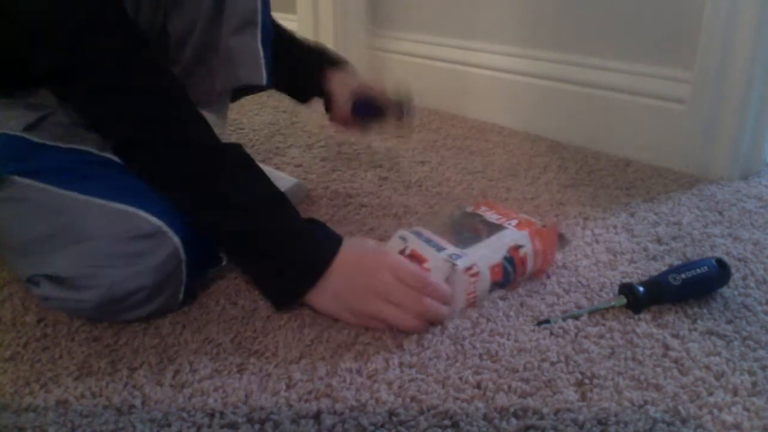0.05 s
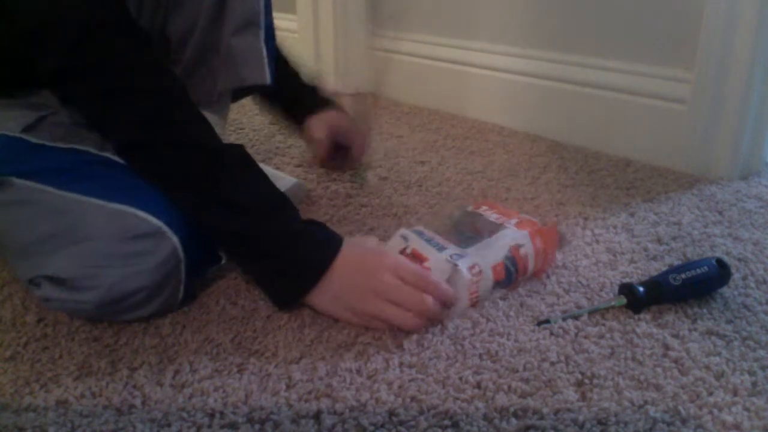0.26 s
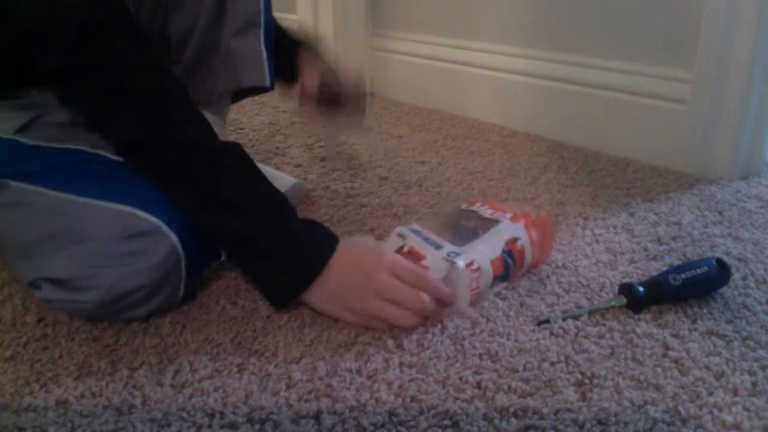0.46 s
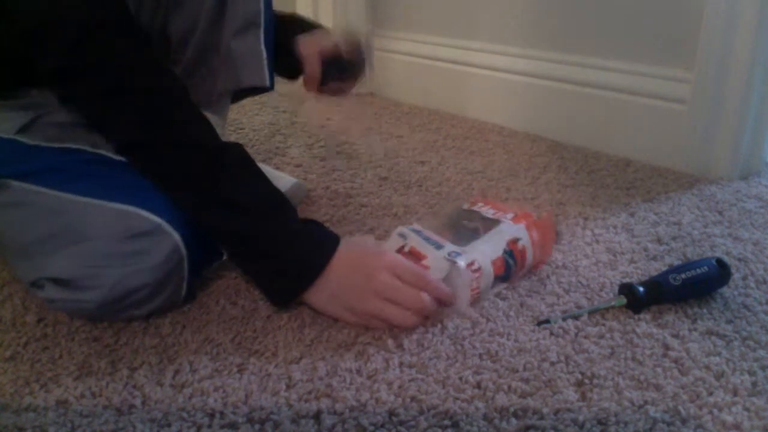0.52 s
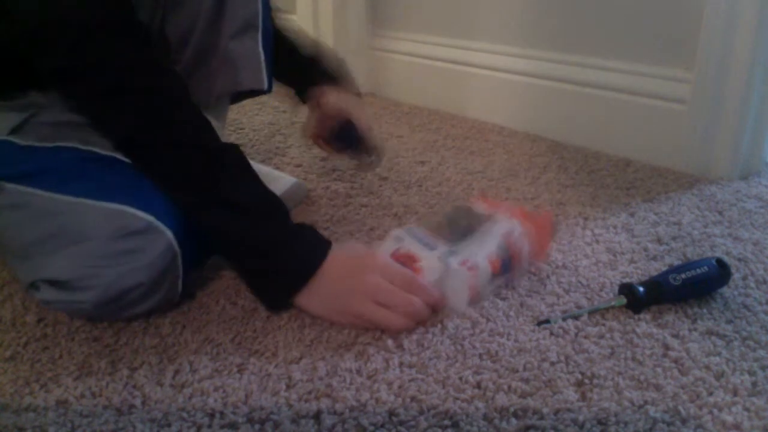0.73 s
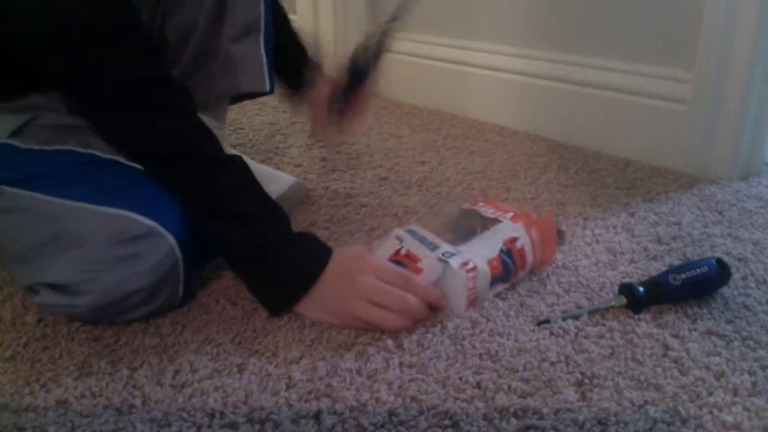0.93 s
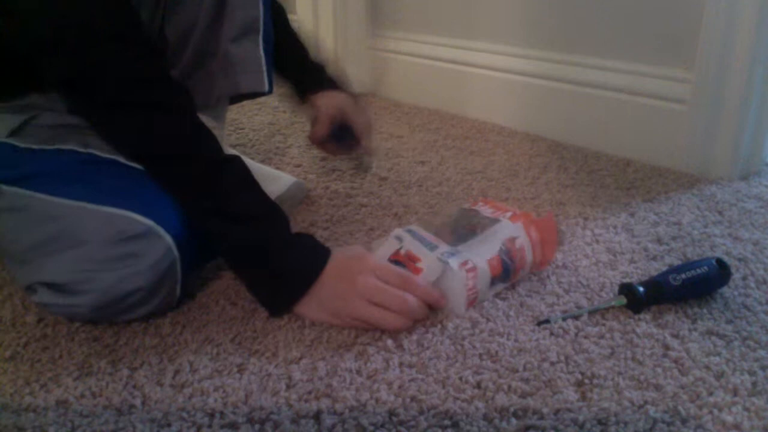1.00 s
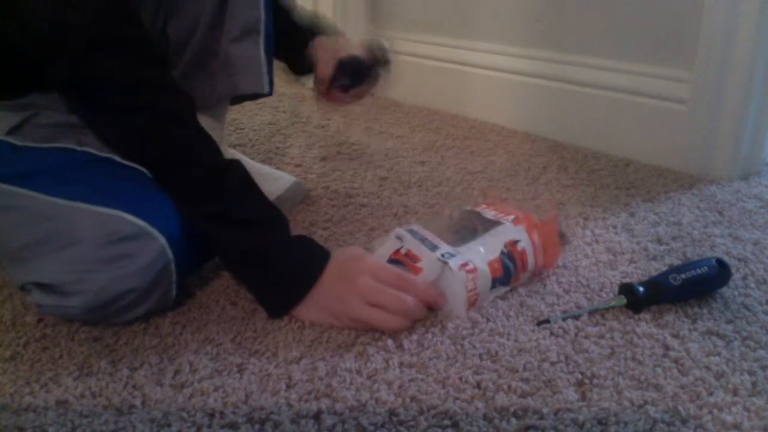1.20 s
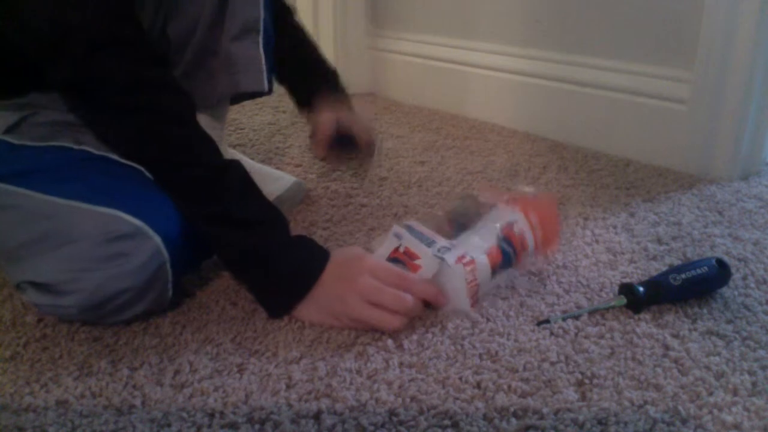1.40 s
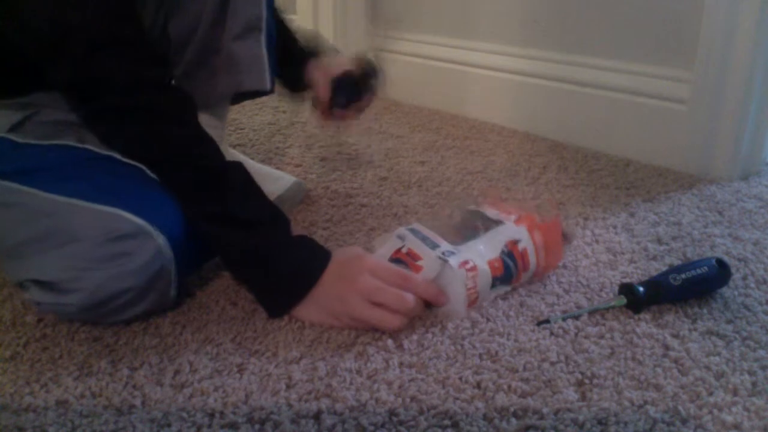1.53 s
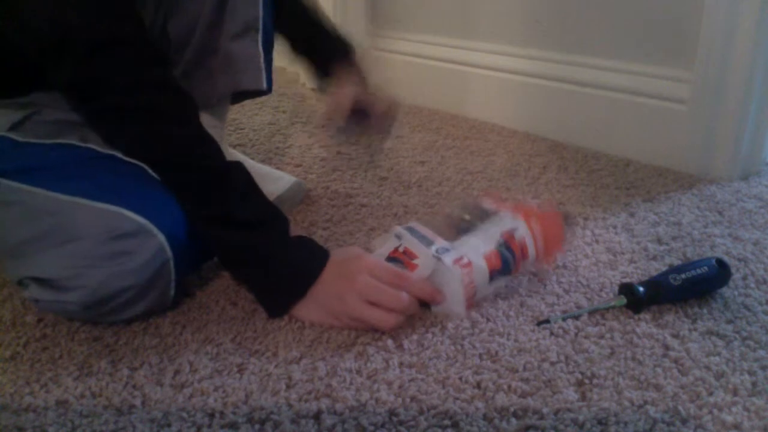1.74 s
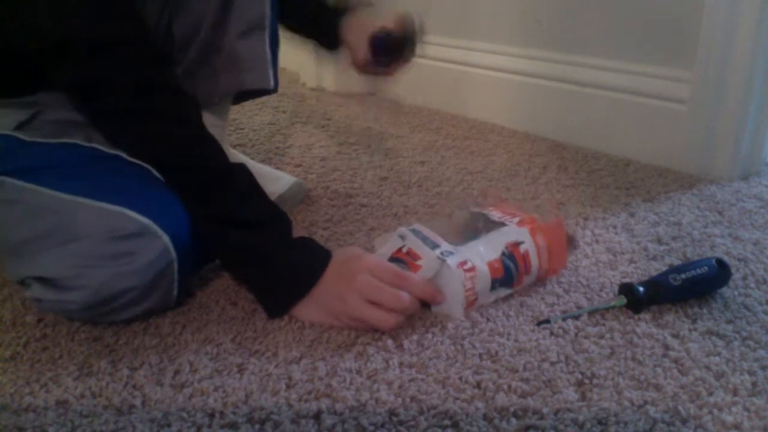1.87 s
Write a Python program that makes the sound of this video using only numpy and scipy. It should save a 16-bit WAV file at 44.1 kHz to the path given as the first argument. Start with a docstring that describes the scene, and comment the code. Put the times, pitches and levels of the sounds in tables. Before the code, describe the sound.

Five sharp, evenly paced knocks of a screwdriver on a cardboard box, close up.

```python
"""Screwdriver on a cardboard box

Small carpeted room, microphone close enough to overload. A screwdriver beats a small box with a plastic
window: each blow rings the panels, crunches the window and squashes the box with a falling thump.
The ceiling slaps back and the room rings. Two thin, fading repeats follow every knock, as if a small
loudspeaker nearby played the microphone back late."""
import sys
import numpy as np
from scipy import signal
from scipy.fft import rfft, irfft, next_fast_len
from scipy.io import wavfile

SR = 44100
rng = np.random.default_rng(int(sys.argv[2]) if len(sys.argv) > 2 else 0)


def generate_wav(signal):
    """Clip the signal to [-1, 1] and save it as 16-bit WAV at the path in sys.argv[1]."""
    frames = np.transpose(np.atleast_2d(signal))
    scaled = np.clip(frames, -1, 1) * 32767
    pcm = np.round(scaled).astype(np.int16)
    wavfile.write(sys.argv[1], SR, pcm)


N = 85995
LEAD_S = .25   # run-up, so that an earlier blow still rings at the start
LEAD = int(LEAD_S * SR)
LENGTH = N + LEAD

# room tone: f/Hz, relative density/dB
AIR_SPECTRUM = [(25, -16), (60, 5.5), (120, -11.5), (250, -11), (450, -25.5), (800, -15.5), (1700, -12.5),
                (2800, -23.5), (5500, -24), (8000, -31.5), (11000, -44.5), (15000, -42)]
# response of the small loudspeaker: f/Hz, level/dB
SPEAKER_RESPONSE = [(80, -25), (220, -12.5), (500, -19.5), (850, -27), (1000, -1.5), (1350, -4.5),
                    (1750, 5), (2300, -6.5), (2650, -4), (3300, -1.5), (4700, 6.5), (5300, 1), (6200, 6),
                    (8000, 7), (8800, -9), (11000, -6), (13000, -16.5), (15500, -34)]
# diffuse tail of a knock: f/Hz, relative density/dB
TAIL_SPECTRUM = [(55, -0.5), (100, -6.5), (160, -10), (280, 2.5), (420, -16), (620, -10), (900, -1.5),
                 (1150, -0.5), (1700, 0.5), (2200, -1), (2900, -13.5), (3800, -5), (5200, -7.5),
                 (7500, -10.5), (10000, -20.5), (14000, -41.5)]
# reverberation time of the room: f/Hz, t60/s
ROOM_DECAY = [(100, 0.25), (260, 0.3), (700, 0.37), (1800, 0.31), (4800, 0.31), (8000, .3), (13000, 0.21)]
# bass bouncing between the walls: t/s, level/dB
WALL_ECHOES = [(0.031, -12.5), (.073, -15.5), (.111, -15)]
# crunch of card and window: f/Hz, relative density/dB
CRUNCH_SPECTRUM = [(200, -14), (500, -7), (800, -17.5), (1500, 8), (2500, -5), (4500, 1.5), (7000, -5.5),
                   (10000, -9.5), (15000, -25)]
# resonances of the box: f/Hz, relative level/dB, t60/s
CARDBOARD_MODES = [(690, -21, 0.011), (1025, -23.5, 0.034), (1146, -18, 0.032), (1149, -11, 0.027),
                   (1370, -18, 0.045), (1780, -21, 0.0095), (1894, -13.5, 0.017), (2063, -14.5, 0.018),
                   (3500, -12, 0.013), (4190, -18.5, 0.011), (4693, -23.5, 0.019)]
# blows, all levels relative: t/s, level/dB, struck panel f/Hz, crunch/dB, window crack/dB,
# hollow knock/dB, thump/dB, thump start f/Hz, room tail/dB
SCREWDRIVER_BLOWS = [(-0.176, -6, 1747, -4.5, 0.5, 8, 0, 436, -1),
                     (0.2236, -2, 1592, 4, -12, -2, 3.5, 482, 0.5),
                     (0.6112, -2.5, 1797, 0, 6, 1, -3, 531, -0.5),
                     (0.9641, -3.5, 1503, 1, -5, -18, 1.5, 548, -1),
                     (1.3063, 0.5, 1622, -3, -6, 1.5, -0.5, 473, -2.5),
                     (1.6336, -0.5, 1760, -1, 2.5, -3, -1.5, 444, -2.5)]

AIR_DB = -55
REPEAT_S, REPEAT_DB = .2895, -24
SPEAKER_SCATTER_DB, SPEAKER_SCATTER_T60_S = -10.5, 0.085   # farther off the microphone, so more diffuse
TAIL_DB, TAIL_ONSET_S = 23.5, 0.0074
CEILING_S, CEILING_DB, CEILING_LOW_CUT_HZ = .0148, -14.5, 254
CEILING_SCATTER_DB, CEILING_SPREAD_S = -11.5, 0.0098
WALL_BAND_HZ = (56, 100)
THUMP_DB, THUMP_ATTACK_S, THUMP_LENGTH_S = -11.5, 0.0023, 0.021
THUMP_END_HZ, THUMP_GLIDE_S = 42.5, 0.00757
CRUNCH_PEAK_S, CRUNCH_WIDTH_S, CRUNCH_DB, CRUNCH_INTO_BOX_DB = 0.0032, .001, -1, 5
SNAPS_PER_S, SETTLE_DB, SETTLE_T60_S = 9000, -8, 0.042
BOX_DB, PANEL_DB, PANEL_T60_S = 1, 2, 0.019
CRACK_HZ, CRACK_DB, CRACK_T60_S = 3230, -11.5, 0.015   # the plastic window
HOLLOW_HZ, HOLLOW_DB, HOLLOW_T60_S = 547, -14, 0.039   # the air in the box
CUTOFF_HZ = 15500


def from_db(db):
    """Decibels to gain."""
    return 10 ** (np.asarray(db) / 20)


def fade(t, t60):
    """Exponential decay, 60 dB down at t60."""
    return np.exp(-np.log(1000) * t / t60)


def at_hz(points, hz):
    """Read a table on a log-frequency axis."""
    freqs, values = np.transpose(points)
    return np.interp(np.log(np.maximum(hz, 1)), np.log(freqs), values)


def unit(x):
    """Scale to energy 1."""
    return x / np.sqrt(np.sum(x ** 2) + 1e-20)


def coloured(x, spectrum):
    """Causal (minimum-phase) filter with the given spectrum."""
    n = 2 * next_fast_len(len(x))
    gain = from_db(at_hz(spectrum, np.linspace(0, SR / 2, n // 2 + 1)))
    cepstrum = irfft(np.log(gain))
    cepstrum[1:n // 2] *= 2
    cepstrum[n // 2 + 1:] = 0
    return irfft(rfft(x, n) * np.exp(rfft(cepstrum)))[:len(x)]


def ring(x, hz, t60):
    """Resonator: a unit click sets off a decaying sine of height 1."""
    r, w = fade(1 / SR, t60), 2 * np.pi * hz / SR
    return signal.lfilter([0, np.sin(w)], [1, -2 * r * np.cos(w), r * r], x + 1e-18)


def delayed(x, s):
    """Delay a sound by s seconds on a track of LENGTH samples."""
    return np.concatenate([np.zeros(int(s * SR)), x, np.zeros(LENGTH)])[:LENGTH]


def overload(x):
    """The close microphone flattens the highest peaks."""
    return x / (1 + x ** 4) ** .25


def room_air():
    """Room tone: faint, steady noise, mostly low rumble."""
    noise = coloured(rng.standard_normal(LENGTH), AIR_SPECTRUM)
    return from_db(AIR_DB) * np.sqrt(LENGTH) * unit(noise)


def speaker_repeat(x):
    """What the microphone picks up comes back late, thin and scattered, as from a small loudspeaker."""
    t = np.arange(SR // 3) / SR
    scatter = unit(rng.standard_normal(len(t)) * fade(t, SPEAKER_SCATTER_T60_S))
    path = from_db(SPEAKER_SCATTER_DB) * scatter
    path[0] += 1   # straight line to the microphone
    played = coloured(overload(x), SPEAKER_RESPONSE)
    return from_db(REPEAT_DB) * delayed(signal.fftconvolve(played, path), REPEAT_S)


def room_tail():
    """The diffuse wash that one knock leaves in the room, dying band by band."""
    t = np.arange(2 * SR // 3) / SR
    edges_hz = np.geomspace(40, 18000, 28)
    white = rng.standard_normal((2, len(t)))   # neighbouring bands take different noise
    onset = 1 - np.exp(-(t / TAIL_ONSET_S) ** 2)
    tail = 0
    for k, (low, high) in enumerate(zip(edges_hz, edges_hz[1:])):
        hz = np.sqrt(low * high)
        band = signal.sosfilt(signal.butter(2, [low, high], "band", fs=SR, output="sos"), white[k % 2])
        band = unit(band * onset * fade(t, at_hz(ROOM_DECAY, hz)))
        tail += band * np.sqrt(2 * (high - low) / SR) * from_db(at_hz(TAIL_SPECTRUM, hz))
    return from_db(TAIL_DB) * tail


def with_reflections(x):
    """At the microphone: direct sound, a scattered ceiling slap, then bass echoes off the walls."""
    t = np.arange(SR // 3) / SR
    scatter = unit(rng.standard_normal(len(t)) * (t > CEILING_S) * np.exp(-t / CEILING_SPREAD_S))
    slap = from_db(CEILING_SCATTER_DB) * scatter
    slap[int(CEILING_S * SR)] += from_db(CEILING_DB)
    slap = signal.sosfilt(signal.butter(1, CEILING_LOW_CUT_HZ, "high", fs=SR, output="sos"), slap)
    bounces = np.zeros(len(t))
    for s, db in WALL_ECHOES:
        bounces[int(s * SR)] += from_db(db)
    bounces = signal.sosfilt(signal.butter(2, WALL_BAND_HZ, "band", fs=SR, output="sos"), bounces)
    response = slap + bounces
    response[0] += 1   # direct sound
    return signal.fftconvolve(x, response)


def thump(t, start_hz):
    """The squashed box gives way: a few low swings that slow down quickly and stop."""
    hz = THUMP_END_HZ + (start_hz - THUMP_END_HZ) * np.exp(-t / THUMP_GLIDE_S)
    swell = (1 - np.exp(-(t / THUMP_ATTACK_S) ** 2)) * np.exp(-(t / THUMP_LENGTH_S) ** 2)
    return swell * np.sin(2 * np.pi * np.cumsum(hz) / SR)


def buckling_snaps(t):
    """The box walls buckle just after contact in a burst of tiny snaps, then settle."""
    burst = np.exp(-.5 * ((t - CRUNCH_PEAK_S) / CRUNCH_WIDTH_S) ** 2)
    settling = from_db(SETTLE_DB) * fade(t, SETTLE_T60_S)
    clicks = rng.standard_normal(len(t)) * (rng.random(len(t)) < SNAPS_PER_S / SR)
    return unit((burst + settling) * clicks)


def knock(panel_hz, crunch_db, crack_db, hollow_db, thump_db, thump_hz):
    """One blow, close up: contact and snaps ring box and window, over a crunch and a thump."""
    t = np.arange(SR // 5) / SR
    contact = -1.0 * (t == 0)
    snaps = buckling_snaps(t)
    force = contact + from_db(CRUNCH_INTO_BOX_DB) * snaps
    box = sum(from_db(BOX_DB + db) * (-1) ** k * ring(force, hz, t60)
              for k, (hz, db, t60) in enumerate(CARDBOARD_MODES))
    panel = from_db(PANEL_DB) * ring(contact, panel_hz, PANEL_T60_S)
    crack = from_db(CRACK_DB + crack_db) * ring(force, CRACK_HZ, CRACK_T60_S)
    hollow = from_db(HOLLOW_DB + hollow_db) * ring(contact, HOLLOW_HZ, HOLLOW_T60_S)
    crunch_gain = from_db(CRUNCH_DB + crunch_db) * np.sqrt(2 * CRUNCH_WIDTH_S * SR)
    crunch = crunch_gain * unit(coloured(snaps, CRUNCH_SPECTRUM))
    squash = from_db(THUMP_DB + thump_db) * thump(t, thump_hz)
    return box + panel + crack + hollow + crunch + squash


def scene():
    """Close knocks in the room, their two fading repeats and the room tone, in mono."""
    knocks = 0
    for s, db, *blow, tail_db in SCREWDRIVER_BLOWS:
        near = delayed(with_reflections(knock(*blow)), s + LEAD_S)
        tail = from_db(tail_db) * delayed(room_tail(), s + LEAD_S)
        knocks += from_db(db) * (near + tail)
    first_repeat = speaker_repeat(knocks)
    air = room_air()
    second_repeat = speaker_repeat(first_repeat)
    return (air + second_repeat + first_repeat + knocks)[None, LEAD:]


def record(dry):
    """The microphone overloads on the peaks; the top treble is cut steeply."""
    high_cut = signal.ellip(10, .1, 70, CUTOFF_HZ, fs=SR, output="sos")
    return signal.sosfilt(high_cut, overload(dry))


dry = scene()
out = record(dry)
generate_wav(out)
```